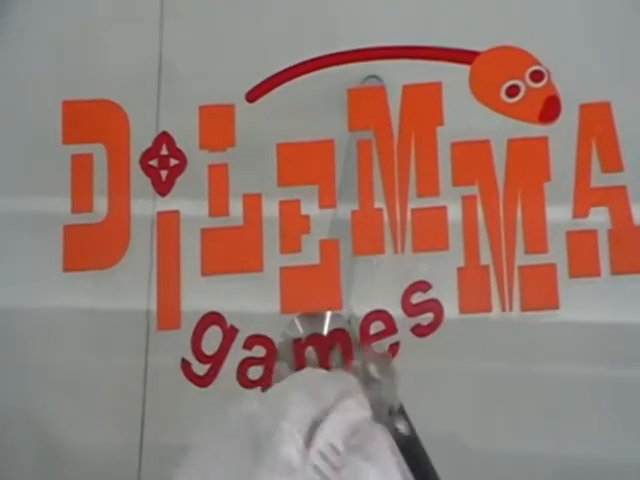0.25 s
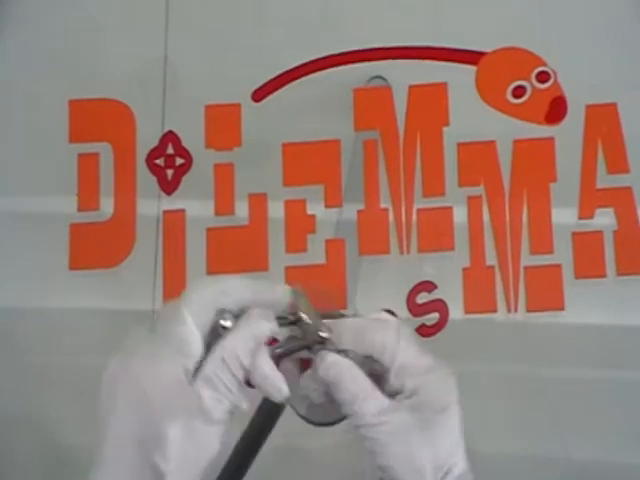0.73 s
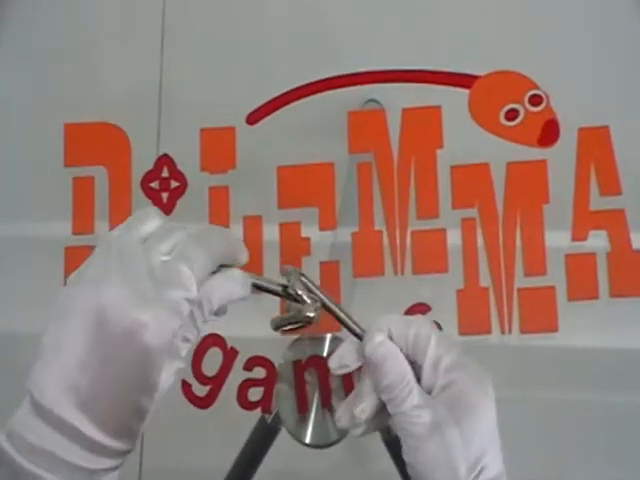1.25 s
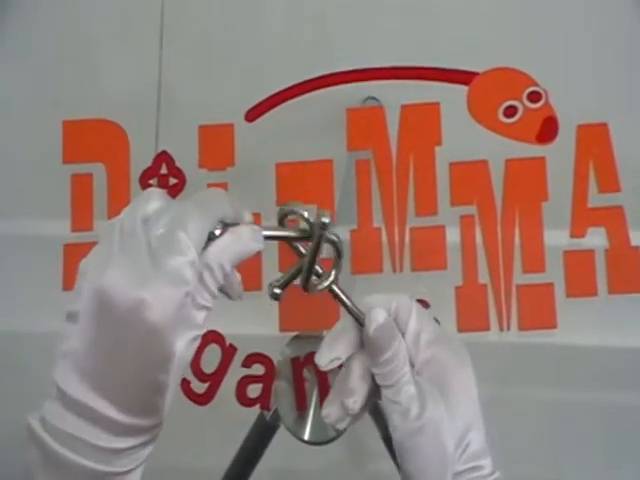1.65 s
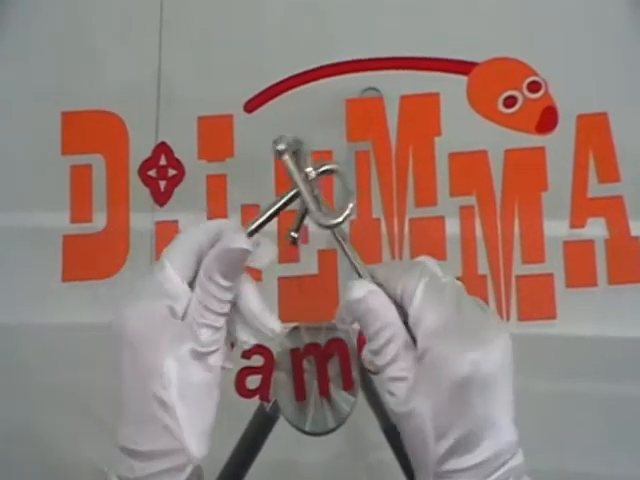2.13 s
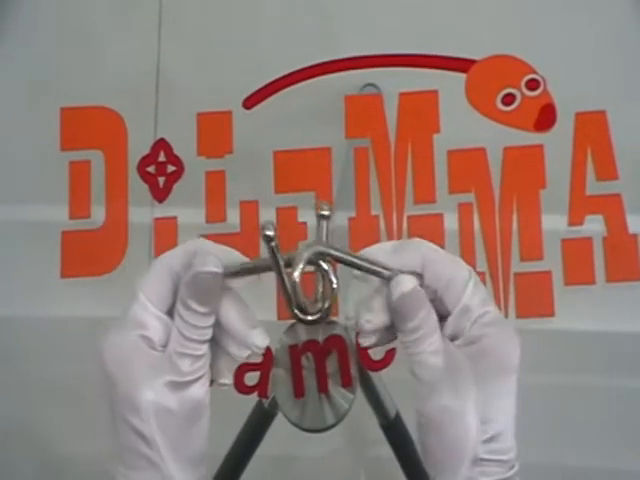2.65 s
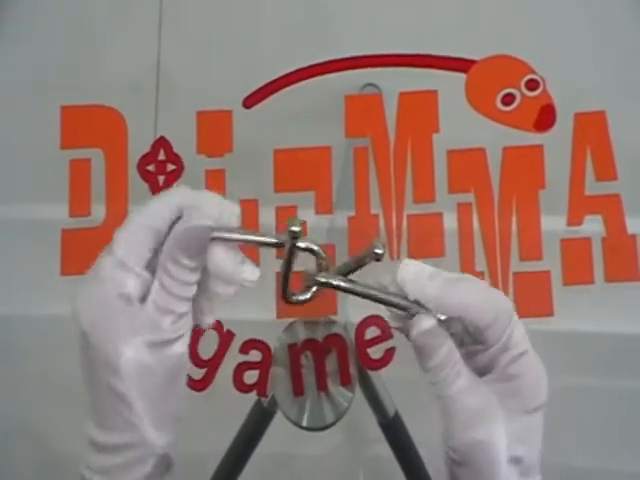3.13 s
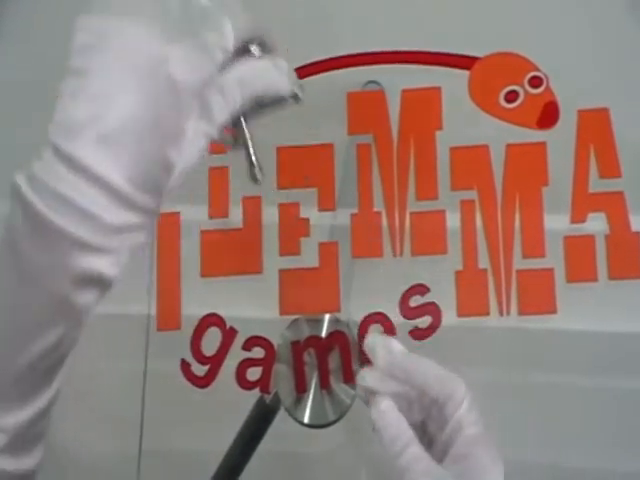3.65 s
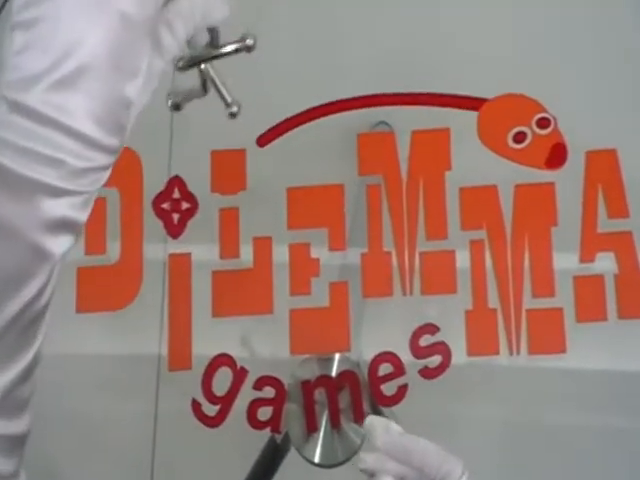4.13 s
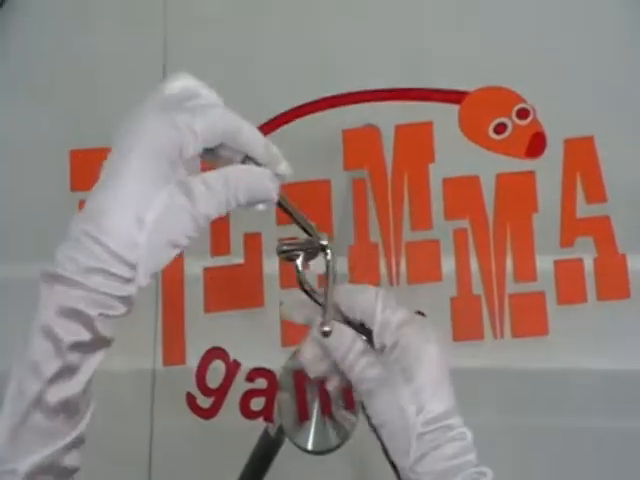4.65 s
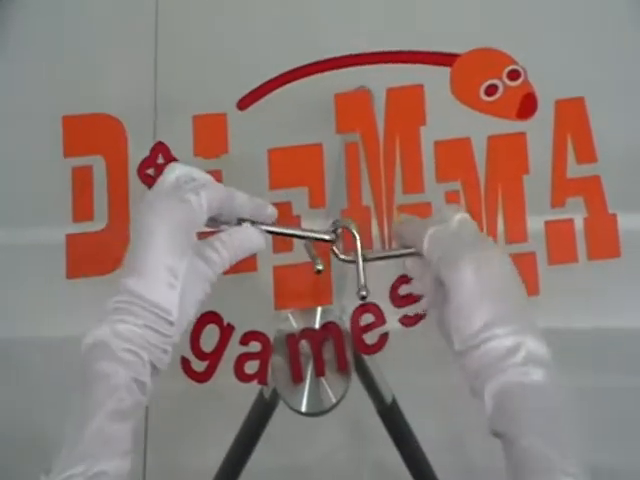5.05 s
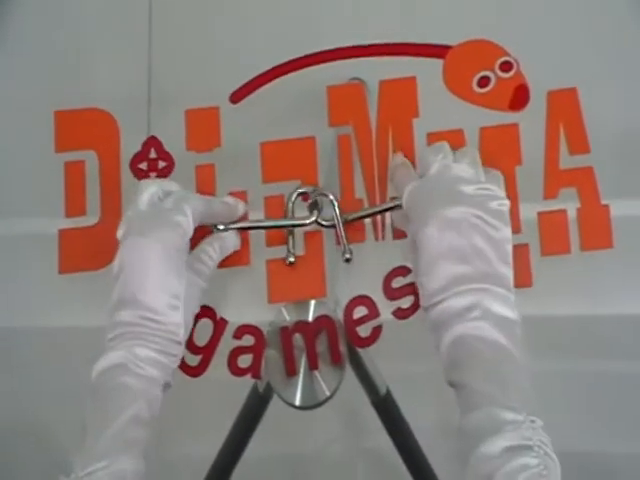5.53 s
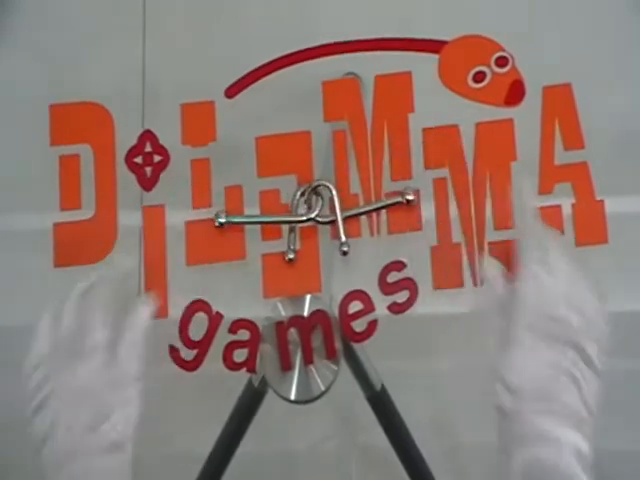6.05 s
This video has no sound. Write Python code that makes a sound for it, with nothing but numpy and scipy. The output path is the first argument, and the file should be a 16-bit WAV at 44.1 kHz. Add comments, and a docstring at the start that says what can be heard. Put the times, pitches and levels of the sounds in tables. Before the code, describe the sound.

In a small, reflective room with low ventilation hiss, thin metal parts tick and ring brightly near a stereo microphone, sometimes skidding for a moment. A faint low drone swells early and fades. After a quieter gap, soft fabric brushes strongly twice among muffled clicks. Metal then touches down on glass in a short cluster, the hardest knock near the end, and a soft cloth stroke finishes.

```python
"""Behind everything a small hard room hums and hisses (sines and coloured noise); a low drone swells early on.
For three seconds gloved hands work two bent steel puzzle pieces: ringing modes clink and tiny hops scrape.
Satin rustles as grainy noise, most strongly after four seconds, with dull clicks and two last clinks.
Past five seconds the steel knocks on a glass table top, which answers with lower, longer modes.
A last stroke of the gloves and two more dull clicks follow."""
import sys
import numpy as np
from scipy import signal
from scipy.fft import rfft, irfft, next_fast_len
from scipy.io import wavfile
from scipy.ndimage import uniform_filter1d

SR = 44100
rng = np.random.default_rng(int(sys.argv[2]) if len(sys.argv) > 2 else 0)


def digitize_waveform(pressure):
    """Quantize a signal to 16-bit integers and store it at the path in sys.argv[1].

    Rows of a 2-D input are taken as channels; values are limited to [-1, 1].
    """
    field = np.atleast_2d(pressure).T
    bounded = np.clip(field, -1, 1)
    quanta = np.round(bounded * 32767).astype(np.int16)
    wavfile.write(sys.argv[1], SR, quanta)


N = 277389
TIME = np.arange(N) / SR


def amp(db):
    """Turns decibels into a gain."""
    return 10 ** (np.asarray(db) / 20)


def rms(x):
    """Gives the average strength of a sound (root mean square)."""
    return np.sqrt(np.mean(x ** 2) + 1e-20)


def read(points, hz):
    """Reads a curve at the given pitches, with pitch on a logarithmic axis."""
    point_hz, value = np.transpose(points)
    return np.interp(np.log(hz + 1), np.log(point_hz + 1), value)


def add(mix, start_s, sound):
    """Mixes a sound in at its start time and cuts it off at the end of the scene."""
    part = mix[round(start_s * SR):][:len(sound)]
    part += sound[:len(part)]


def tint(x, colour):
    """Filters a sound by a curve of (pitch_hz, level_db)."""
    size = next_fast_len(len(x) + SR // 20)
    gain = amp(read(colour, np.fft.rfftfreq(size, 1 / SR)))
    return irfft(rfft(x, size) * gain, size)[:len(x)]


def noise(colour, size):
    """Makes coloured noise of rms 1."""
    x = tint(rng.standard_normal(size), colour)
    return x / rms(x)


# colour of the room's hiss: pitch_hz [Hz], relative level_db [dB per Hz]
HISS_COLOUR = [(15, -45), (30, -29), (68, -24), (100, -7), (160, -2), (300, -2.5), (450, -8.5), (850, -9.5),
               (1100, -15), (2600, -23), (5400, -34.5), (7000, -42), (11000, -46), (16000, -50)]
# a hollow in the hiss: pitch_hz [Hz], half_width_hz [Hz], level_db [dB]
HISS_HOLLOW = (503.4, 35, -11.5)
# hum lines: pitch_hz [Hz], typical level_db [dB rms]; the level wavers around it
HUM_LINES = [(49, -71), (88, -64.5), (148, -58), (343, -61.5)]
# spread of the hiss: pitch_hz [Hz], side_minus_mid_db [dB]
HISS_WIDTH = [(60, -12.5), (110, -13.5), (200, -20), (380, -14.5), (700, -12), (1290, -7.5), (2380, -5.5),
              (4400, -4.5), (8120, -2.5), (15000, -2)]
HISS_DB = -46  # level before the hollow is cut


def background(waver_turns=0.52, waver_db=0.91):
    """Ventilation: a low rush that differs left and right, with hum lines wavering in level and phase."""
    hz = np.fft.rfftfreq(N, 1 / SR)
    hollow_hz, half_width_hz, hollow_db = HISS_HOLLOW
    hollow = amp(hollow_db * np.exp(-((hz - hollow_hz) / half_width_hz) ** 2))
    mid, side = (amp(HISS_DB) * irfft(rfft(noise(HISS_COLOUR, N)) * hollow, N) for _ in range(2))
    for line_hz, db in HUM_LINES:
        drift = np.interp(TIME, np.linspace(0, TIME[-1], num=40), rng.standard_normal(40))
        turns = line_hz * TIME + waver_turns * drift
        mid = mid + amp(db + waver_db * drift) * np.sqrt(2) * np.sin(2 * np.pi * turns)
    side = tint(side, HISS_WIDTH)
    return np.array([mid + side, mid - side])


# swells of the drone: peak_s [s], level_db of the lower tone [dB rms], octave_db [dB re level_db]
DRONE_SWELLS = [(.2, -58, 9), (1.1, -56, 4.5), (2.1, -55, -4)]
DRONE_FROM_HZ, DRONE_TO_HZ, DRONE_CLIMB_S = 102.5, 122.2, 2  # the pitch climbs, then holds
DRONE_SWELL_S = .33  # time from a swell's peak until it has faded to 37 %


def drone():
    """A faint far drone: two tones an octave apart climb together, swelling and fading."""
    hz = np.interp(TIME, [0, DRONE_CLIMB_S], [DRONE_FROM_HZ, DRONE_TO_HZ])
    phase = 2 * np.pi * np.cumsum(hz) / SR
    first = np.sqrt(2) * np.sin(phase)
    octave = np.sqrt(2) * np.sin(2 * phase)
    out = np.zeros(N)
    for peak_s, db, octave_db in DRONE_SWELLS:
        swell = np.exp(-((TIME - peak_s) / DRONE_SWELL_S) ** 2)
        out += amp(db) * swell * (first + amp(octave_db) * octave)
    return out


# how long the room's echo lasts: pitch_hz [Hz], t60_s, the time to fall by 60 dB [s]
ROOM_T60 = [(300, 0.27), (1500, 0.81), (3500, 0.43), (7000, 0.45), (10500, 0.34), (15000, 0.17)]


def room(x, gap_s=0.0025, build_s=0.0046):
    """An echo tail of energy 1 builds after a short gap; each pitch range dies at its own speed."""
    hz, t, grid = signal.stft(rng.standard_normal(SR), SR, nperseg=256)
    fade = amp(-60 * t / read(ROOM_T60, hz)[:, None])
    tail = signal.istft(grid * fade, SR, nperseg=256)[1][:SR]
    tail = tail * np.clip((TIME[:SR] - gap_s) / build_s, 0, 1)
    return signal.fftconvolve(x, tail / np.linalg.norm(tail))[:N]


def burst(colour, t60, chatter_db, chatter_t60, size=SR // 3):
    """A sharp contact, then a weaker chatter as the surfaces settle."""
    t = TIME[:size]
    contact = amp(-60 * t / t60)
    chatter = amp(chatter_db - 60 * t / chatter_t60)
    return noise(colour, size) * (contact + chatter)


# strokes of the gloves: peak_s, the fastest moment [s], length_s [s], level_db at the peak [dB]
STROKES = [(.35, 0.98, -63.5), (3.75, .7, -75), (4.261, 0.33, -48.5), (4.56, 0.47, -59.5),
           (4.73, .25, -60.5), (4.914, 0.3, -50.5), (5.14, 0.84, -62.5), (6.1, 1.0, -55)]
STROKE_RISE, STROKE_DEPTH_DB = 0.29, 19.5  # share spent speeding up; drop from the peak to the ends
GRIP_DB = -76  # rustle of gloves that only hold


def sliding():
    """Loudness of the satin: each stroke speeds up quickly and slows down gently."""
    power = amp(GRIP_DB) ** 2
    for peak_s, length_s, db in STROKES:
        u = (TIME - peak_s) / length_s
        away = np.maximum(-u / STROKE_RISE, u / (1 - STROKE_RISE))
        power = power + amp(db - STROKE_DEPTH_DB * away) ** 2
    return np.sqrt(power)


# colour of the satin's rustle: pitch_hz [Hz], relative level_db [dB per Hz]
SATIN_COLOUR = [(40, -31), (300, -4.5), (1200, 1), (3500, -4), (6000, -6.5), (10000, -14.5), (16000, -22.5)]
# dull clicks of a piece shifting in the fingers: start_s [s], level_db before the trim below [dB]
TAPS = [(0.5567, -49), (0.5686, -48), (0.5747, -44), (2.5433, -43.5), (4.198, -42), (4.249, -39.5),
        (4.273, -36.5), (4.3456, -36.5), (6.1005, -31.5), (6.184, -47)]
# colour of those clicks: pitch_hz [Hz], relative level_db [dB]
TAP_COLOUR = [(60, -30.5), (300, -11), (1300, 5.5), (3500, -2.5), (7000, -7), (12000, -16), (16000, -15)]


def gloves(tap_trim_db=-1, grain_db=1.0):
    """Satin slides with a fine grain in its loudness; now and then a piece clicks in the fingers."""
    grain = uniform_filter1d(rng.standard_normal(N), size=260)
    flicker = amp(grain_db * grain / rms(grain))
    out = noise(SATIN_COLOUR, N) * sliding() * flicker
    for start_s, db in TAPS:
        tap = burst(TAP_COLOUR, t60=0.0082, chatter_db=-14.5, chatter_t60=0.12)
        add(out, start_s, amp(db + tap_trim_db) * tap)
    return out


# one piece skidding along the other: start_s [s], end_s [s], level_db [dB]
SCRAPES = [(.201, 0.3, -40.5), (.725, 0.77, -32.5), (2.316, 2.39, -41.5), (1.47, 1.6, -66.5),
           (.695, 0.79, -65), (2.77, 2.858, -69)]
# colour of the hops: pitch_hz [Hz], relative level_db [dB]
SCRAPE_COLOUR = [(100, -49.5), (1200, -10), (2500, -12.5), (3200, 0), (4500, -3), (6500, 2), (9000, -1),
                 (10500, 2), (13500, -8.5), (16000, -1.5)]


def scrapes(hops_per_s=900, spread_db=4):
    """Sliding steel catches and hops: a dense train of tiny uneven contacts."""
    out = np.zeros(N)
    size = amp(spread_db * np.minimum(rng.exponential(size=N), 3)) * rng.choice([-1, 1], size=N)
    lands = rng.random(N) < hops_per_s / SR
    hops = tint(size * lands, SCRAPE_COLOUR)
    for start_s, end_s, db in SCRAPES:
        out += amp(db) * hops / rms(hops) * ((TIME > start_s) & (TIME < end_s))
    return out


def strike(hz, db, t60, edges, family_db, window_s, build_cycles, turns, size):
    """Dying modes start at the given turns; each family gets its set rms over the first moments."""
    t = TIME[:size]
    hz, db, t60, turns = np.array([hz, db, t60, turns])[:, :, None]
    swell = 1 - np.exp(-hz * t / build_cycles)  # the blow takes some cycles to spread through the body
    fade = np.exp(-np.log(1000) * t / np.maximum(t60, .01))
    uneven_db = db + rng.standard_normal(db.shape)
    tones = amp(uneven_db) * swell * fade * np.sin(2 * np.pi * (hz * t + turns))
    family = np.digitize(hz[:, 0], edges)
    out = np.zeros(size)
    for k, level_db in enumerate(family_db):
        ring = tones[family == k].sum(0)
        out += amp(level_db) * ring / rms(ring[t < window_s])
    return out


# mode families of the glass: centre_hz [Hz], level_db [dB]
GLASS_RESPONSE = [(1300, -0.5), (2900, -2.5), (5000, 2.5), (9500, 0)]
CONTACT_ORDER = 6.8  # steepness with which a soft contact spares the higher modes


def glass_families(strength_db, corner_hz, weight_db):
    """Level of each glass family: a soft contact spares the high ones, weight drives the lowest."""
    hz, db = np.transpose(GLASS_RESPONSE)
    softness_db = 10 * np.log10(1 + (hz / corner_hz) ** CONTACT_ORDER)
    return strength_db + db - softness_db + weight_db * (hz == hz.min())


# steel on glass: start_s [s], strength_db [dB], corner_hz above which the contact excites less [Hz],
# weight_db, extra for the lowest family [dB], tick_db [dB re strength], ring length [factor],
# flat [0 on one end to 1 flat]
KNOCKS = [(5.335, -34.5, 10900, -1, 6.5, 0.54, .047), (5.377, -25.5, 2000, -0.5, -31, 0.46, 0.53),
          (5.452, -40.5, 3540, -32, -5, 0.28, 0.048), (5.52, -35, 5800, 5.5, 7, 0.41, 0),
          (5.696, -56, 4200, -23, -3, .67, 0), (5.7535, -32, 13000, -10, 7, 0.89, 0.24),
          (5.8, -21, 12100, -2.5, 7.5, 0.76, .9), (5.816, -32.5, 11000, -4, 14.5, 0.29, 0.31)]
# borders between the glass's four mode families: pitch_hz [Hz]
GLASS_EDGES = [1500, 3300, 7200]
# modes of the glass with the steel on it; the steel's own mode near 12.5 kHz sings on longest: pitch_hz [Hz]
GLASS_HZ = [713, 1162, 1326, 1342, 1684, 1808, 2018, 2283, 2839, 2918, 3672, 3774, 3964, 4630, 4790, 4853,
            4922, 5100, 6445, 6880, 7645, 7795, 7934, 9092, 9415, 10379, 10570, 11085, 12458, 15127]
# their levels within a family when struck with an end: level_db [dB]
GLASS_END_DB = [-56, -39.5, 0.5, 4, -20, -19, -14, -5, -28, -3, -11, -2, 2, -14, -14, -1.5, -17.5, 1.5, 2,
                -18, -11, 5, 5, -8, 12, -7, 4.5, 6, -19, -15]
# their levels within a family when struck flat: level_db [dB]
GLASS_FLAT_DB = [-1.5, -8, 0.5, 1.5, -5, -14, -16, -24, -1, 3.5, -24, -10, 0, -23, 11, -2.5, 17, 1.5, 6,
                 -25.5, 6, -1, 5.5, 4.5, -2, -2.5, -6, -0.5, -28, -0.5]
# their time to fall by 60 dB before a knock's ring length factor: t60_s [s]
GLASS_T60 = [0.48, 0.43, 0.54, 0.34, 0.69, 0.57, 0.46, 0.31, 0.34, 0.33, 0.27, 0.28, 0.43, 0.19, 0.06, 0.35,
             0.063, 0.24, 0.19, 0.15, 0.094, 0.24, 0.15, 0.16, 0.063, 0.47, 0.21, 0.17, 1.7, 0.29]
# colour of the contact noise on glass: pitch_hz [Hz], relative level_db [dB]
GLASS_TICK = [(40, -43.5), (200, -22), (700, -3), (2000, 4), (5000, 4.5), (7000, 4), (10000, -9),
              (12700, -9), (14000, -25), (16000, -31)]


def knocks(ring_trim_db=-1):
    """The pieces touch the glass on an end or more nearly flat, which decides the modes that ring."""
    out = np.zeros(N)
    # neighbouring modes swing against each other, so a close pair blooms before it fades
    turns = np.arange(len(GLASS_HZ)) / 2
    for start_s, strength_db, corner_hz, weight_db, tick_db, length, flat in KNOCKS:
        family_db = glass_families(strength_db, corner_hz, weight_db)
        mode_db = np.array(GLASS_END_DB) + flat * np.subtract(GLASS_FLAT_DB, GLASS_END_DB)
        ring = strike(GLASS_HZ, mode_db, length * np.array(GLASS_T60), GLASS_EDGES, family_db,
                      window_s=0.045, build_cycles=9.9, turns=turns, size=SR * 2 // 3)
        tick = burst(GLASS_TICK, t60=0.013, chatter_db=-14, chatter_t60=0.44, size=len(ring))
        add(out, start_s, amp(ring_trim_db) * ring + amp(strength_db + tick_db) * tick)
    return out


# steel on steel: start_s [s], strength_db [dB], brightness [dB per octave],
# tip, the place of contact [-1 on the loop to 1 at the tip], ring length [factor],
# first_db by which the first piece rings more and the second less [dB], rebounds [count]
CLINKS = [(0.1997, -22, -6, 0.28, .7, -4, 0), (0.201, -19, 3.5, .4, .8, -4, 1),
          (0.2405, -20, 2, -0.71, 0.34, 1, 2), (0.617, -67, 0, -.2, 1, -3, 0),
          (0.7239, -23.5, 4.5, 0.036, .8, -13, 1), (0.7453, -26.5, -9.5, -.4, 0.57, -3.5, 1),
          (1.164, -65, -16, .3, 0.59, -1, 0), (1.5208, -57.5, -2, -.8, .91, -1, 0),
          (1.581, -61, -3, -.3, 0.83, -9, 0), (2.2437, -30, 5.5, 0.43, .9, -5, 0),
          (2.314, -25.5, 5, -0.67, .42, -1, 2), (2.361, -35, 0, .2, 0.44, -2, 0),
          (2.507, -36.5, 4.5, .9, .3, -3.5, 0), (2.788, -60.5, -6.5, .5, 1, 0.5, 0),
          (2.8596, -16.5, -4, 0.14, .8, 4, 0), (2.9836, -39.5, -9, 0.043, 0.71, 0, 0),
          (4.614, -59, -21, 0.037, 0.58, 5, 0), (5.0772, -39, -8, 0.05, .67, 2, 0)]
# mode families of the steel: centre_hz [Hz], level_db in a medium blow [dB],
# extra per strength [dB per dB], tip_db, extra at the tip [dB]
STEEL_RESPONSE = [(3000, -24.5, -0.45, -0.5), (6600, -8, 0.1, 0.5), (10590, -3, 0, -2),
                  (12600, -15.5, 0.2, 9), (15060, -10.5, 0.1, -2.5)]
MEDIUM_BLOW_DB = -25
# brightness tilts the treble about the pivot; families below the first pitch all shift alike
BRIGHT_FROM_HZ, BRIGHT_PIVOT_HZ = 7600, 10600
# contact tick: dB in a medium blow, dB per dB of strength, extra dB at the tip
TICK_DB, TICK_SLOPE, TICK_TIP_DB = -28, 0.8, 5.5
# each rebound comes this much later and weaker, with a softer tick
REBOUND_S, REBOUND_LOSS_DB, REBOUND_TICK_DB = .0098, 3, -4.5


def rebounding():
    """Lists every steel contact: strength, brightness and place set its levels; rebounds weaken."""
    hz, medium_db, per_db, tip_db = np.transpose(STEEL_RESPONSE)
    octaves = np.log2(np.maximum(hz, BRIGHT_FROM_HZ) / BRIGHT_PIVOT_HZ)
    contacts = []
    for start_s, strength_db, bright, tip, length, first_db, rebounds in CLINKS:
        for k in range(rebounds + 1):
            db = strength_db - k * REBOUND_LOSS_DB
            force_db = db - MEDIUM_BLOW_DB
            family_db = db + medium_db + per_db * force_db + tip_db * tip + bright * octaves
            tick_db = TICK_DB + TICK_SLOPE * force_db + TICK_TIP_DB * tip + REBOUND_TICK_DB * (k > 0)
            contacts.append((start_s + k * REBOUND_S, family_db, tick_db, length, first_db))
    return contacts


# borders between the steel's five mode families: pitch_hz [Hz]
STEEL_EDGES = [5000, 8500, 11800, 13800]
# modes of the hand-held pieces: pitch_hz [Hz]
STEEL_HZ = [2019, 2961, 3085, 3435, 6485, 6548, 6616, 6903, 6990, 10210, 10320, 10379, 10450, 10597, 10650,
            10785, 12459, 12613, 14800, 14890, 15120, 15190, 15310]
# their levels within a family: level_db [dB]
STEEL_DB = [-9.5, -3, -4, -0.5, -7.5, -10.5, 0.5, 1, -12.5, -8.5, -1.5, 5.5, -6.5, 3, 1.5, -8, 0, 0.5, -1.5,
            -5, 1, -3.5, -7.5]
# their time to fall by 60 dB before a clink's ring length factor: t60_s [s]
STEEL_T60 = [0.14, 0.18, 0.08, 0.22, .08, 0.17, 0.041, 0.091, .05, 0.033, 0.045, 0.13, .07, .09, .09, 0.076,
             0.47, .31, .07, .06, 0.086, 0.1, .05]
# the piece each mode belongs to: piece [1 the first, -1 the second, 0 both]
STEEL_PIECE = [0, 0, 0, 0, 1, -1, -1, 1, 1, 1, 1, 1, 0, -1, -1, -1, 1, 0, 1, -1, 0, -1, -1]
# colour of the contact noise on steel: pitch_hz [Hz], relative level_db [dB]
STEEL_TICK = [(80, -61), (300, -34), (1500, -20.5), (4000, -7), (6000, -3.5), (8000, -2), (10500, 0),
              (13500, -7), (16000, -6)]


def clinks():
    """The pieces hit and rebound; the grip cuts their ring short, and the looser one rings more."""
    out = np.zeros(N)
    for start_s, family_db, tick_db, length, first_db in rebounding():
        mode_db = np.array(STEEL_DB) + first_db * np.array(STEEL_PIECE)
        # each mode starts at a random point of its cycle, so the peaks do not pile up
        turns = rng.random(len(STEEL_HZ))
        ring = strike(STEEL_HZ, mode_db, length * np.array(STEEL_T60), STEEL_EDGES, family_db,
                      window_s=.025, build_cycles=0.94, turns=turns, size=SR // 3)
        tick = burst(STEEL_TICK, t60=0.0065, chatter_db=-9.5, chatter_t60=0.057, size=len(ring))
        add(out, start_s, ring + amp(tick_db) * tick)
    return out


# colour of the sound sent into the room: pitch_hz [Hz], level_db [dB]
ROOM_COLOUR = [(600, 3.5), (1330, -11), (2000, -0.5), (3000, 3.5), (8000, -3.5), (16000, 1)]
# spread of the echo tail: pitch_hz [Hz], side_minus_mid_db [dB]
ROOM_WIDTH = [(500, -10.5), (2000, -5.5), (5000, -10.5), (9000, -7.5), (13000, -1.5)]


def scene(hands_room_db=-7, glass_room_db=-6):
    """Near sounds lie close to the middle; the broad glass feeds the room more than the small pieces do."""
    hands = gloves() + scrapes() + clinks()
    glass = knocks()
    send = tint(amp(hands_room_db) * hands + amp(glass_room_db) * glass, ROOM_COLOUR)
    mid = hands + glass + room(send)
    side = tint(room(send), ROOM_WIDTH)
    lean = amp(.25)  # slightly louder on the left
    near = np.array([(mid + side) * lean, (mid - side) / lean])
    return near + background() + drone()


EDGE_HZ = 16300


def record(dry):
    """Takes away the treble above the edge pitch with a steep low-pass filter."""
    lowpass = signal.firwin(255, EDGE_HZ, window=("kaiser", 9), fs=SR)
    return signal.oaconvolve(dry, lowpass[None], "same", axes=1)


dry = scene()
out = record(dry)
digitize_waveform(out)
```